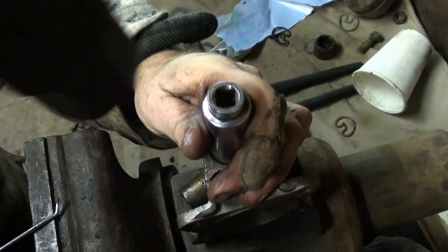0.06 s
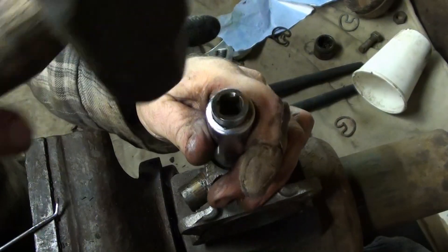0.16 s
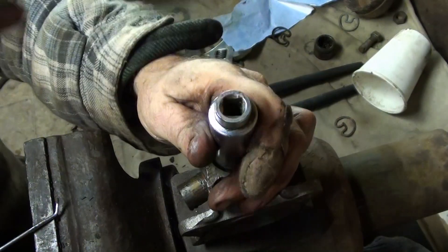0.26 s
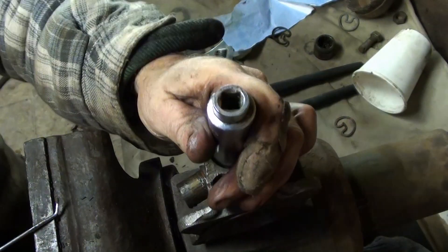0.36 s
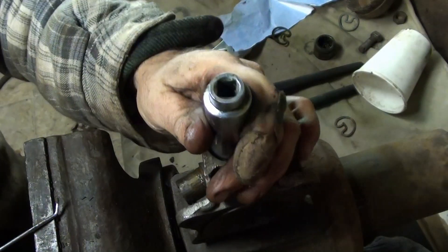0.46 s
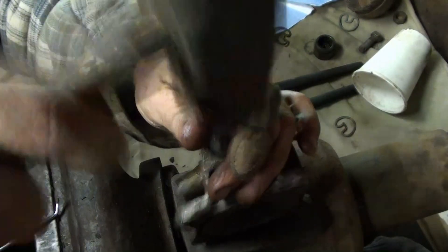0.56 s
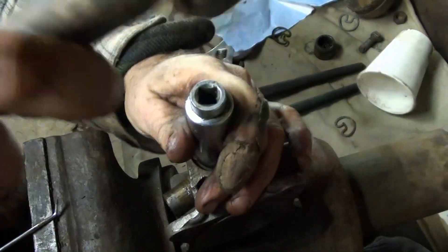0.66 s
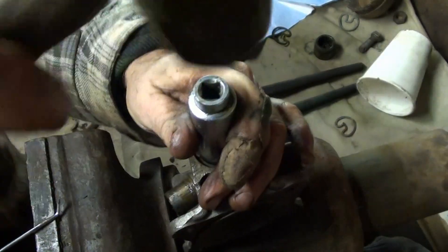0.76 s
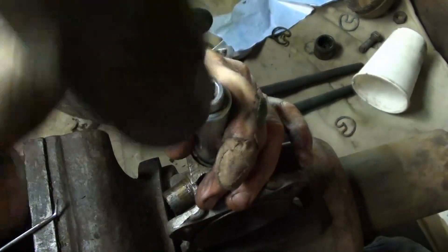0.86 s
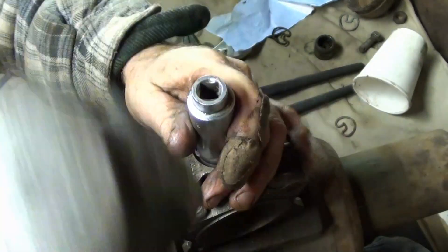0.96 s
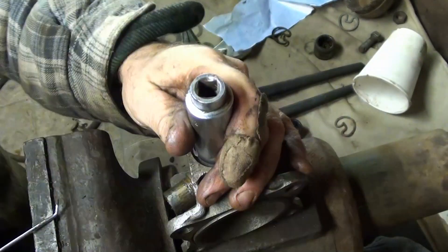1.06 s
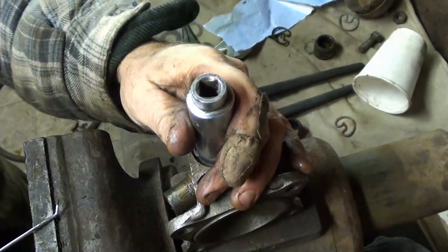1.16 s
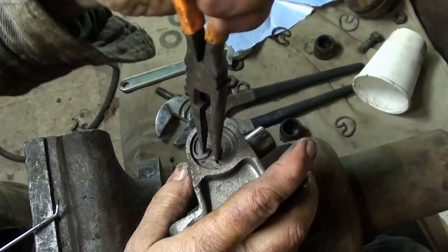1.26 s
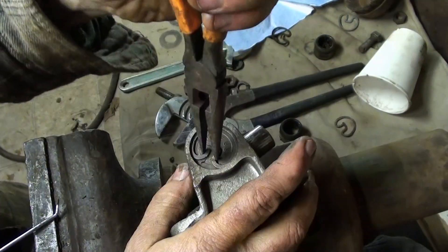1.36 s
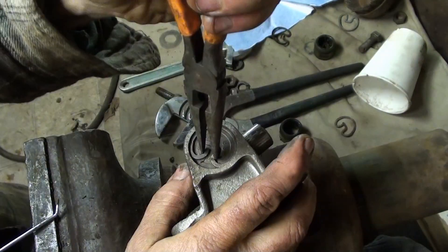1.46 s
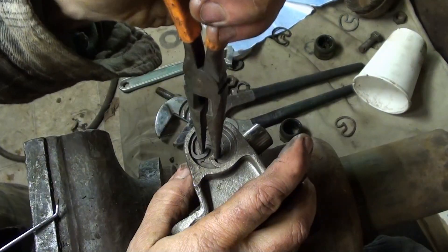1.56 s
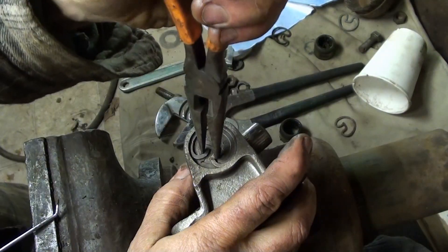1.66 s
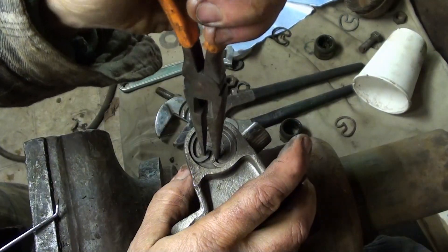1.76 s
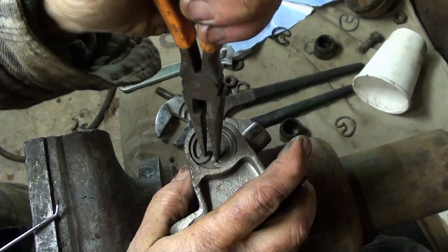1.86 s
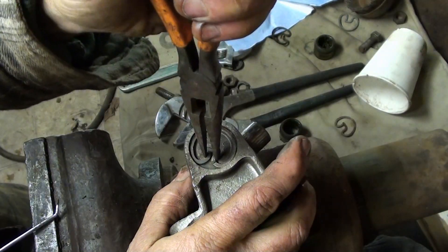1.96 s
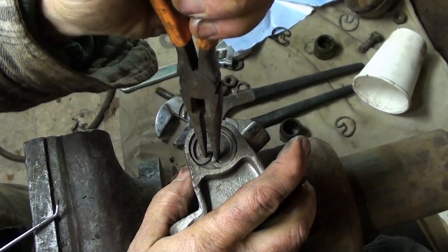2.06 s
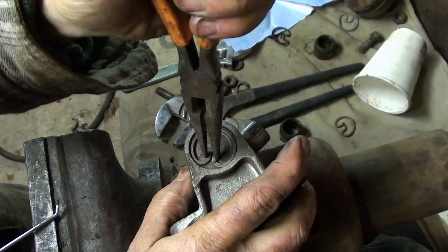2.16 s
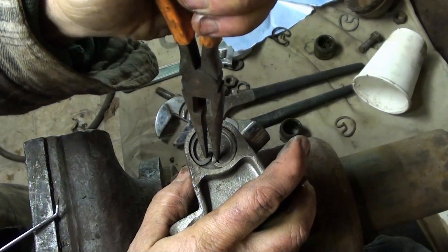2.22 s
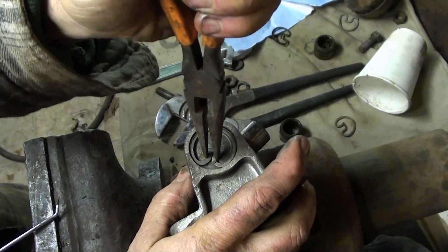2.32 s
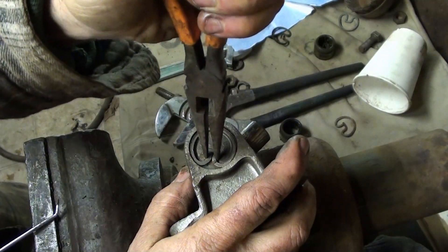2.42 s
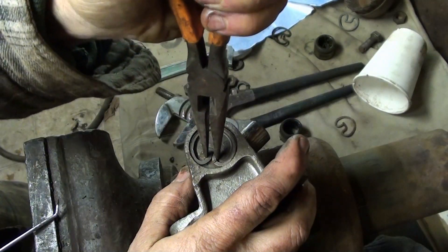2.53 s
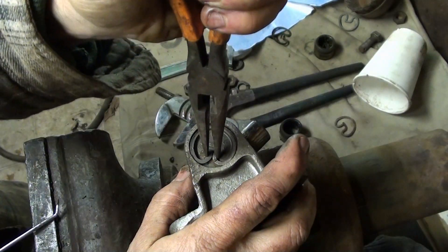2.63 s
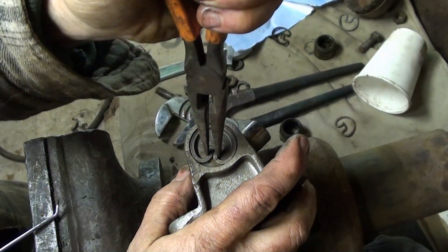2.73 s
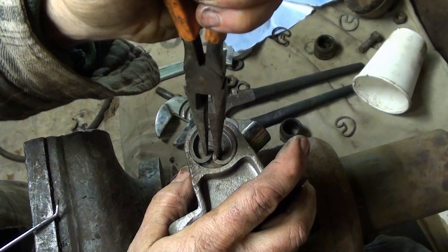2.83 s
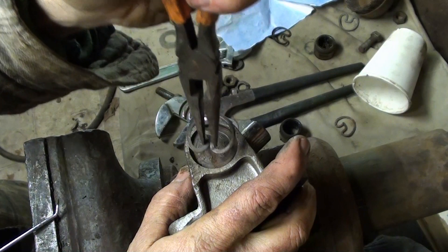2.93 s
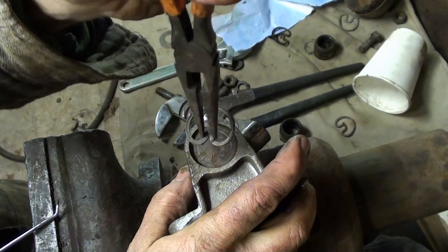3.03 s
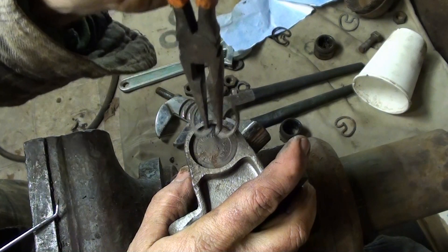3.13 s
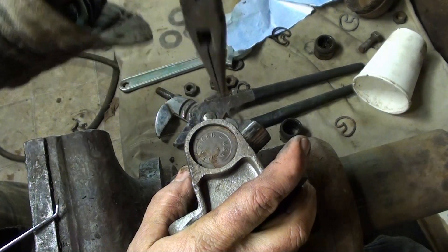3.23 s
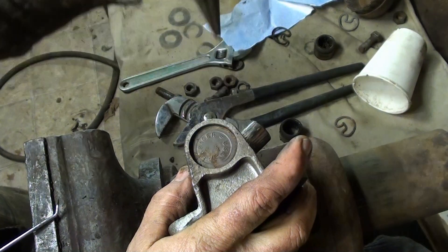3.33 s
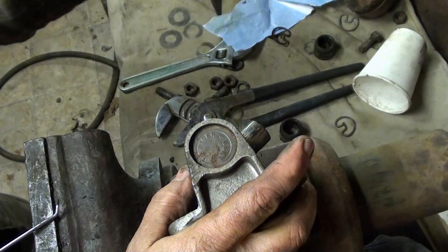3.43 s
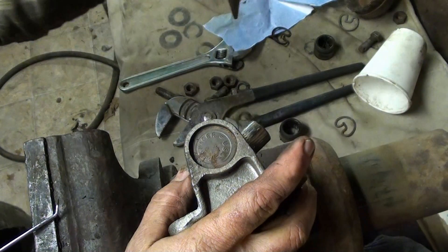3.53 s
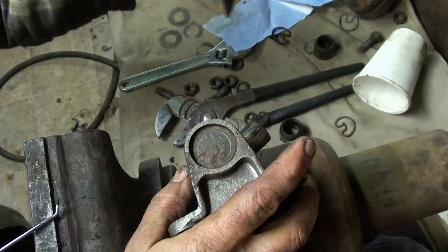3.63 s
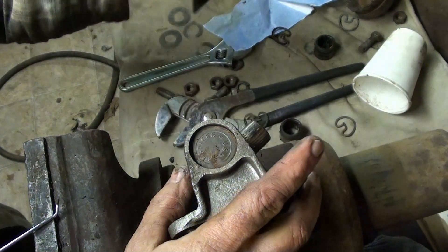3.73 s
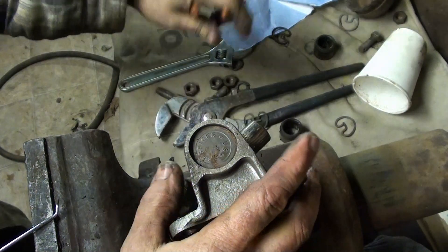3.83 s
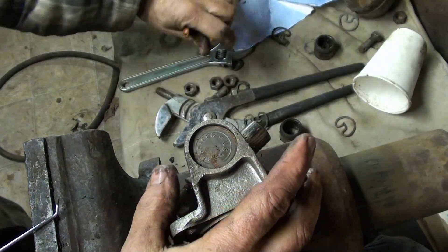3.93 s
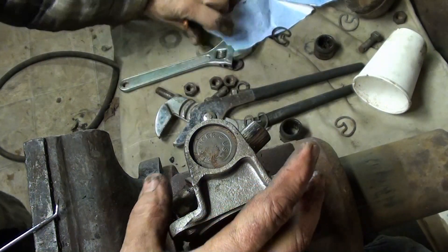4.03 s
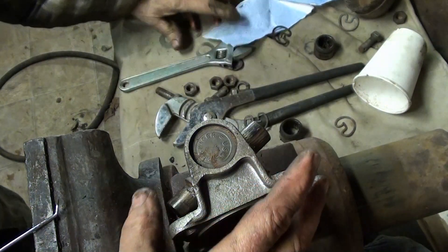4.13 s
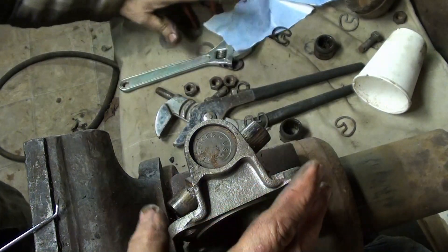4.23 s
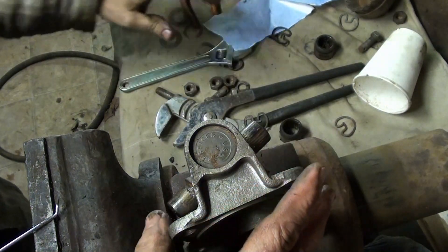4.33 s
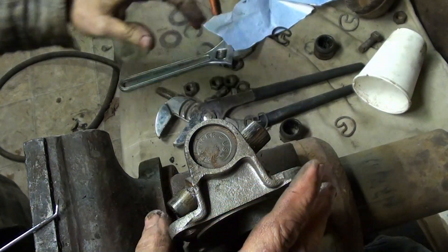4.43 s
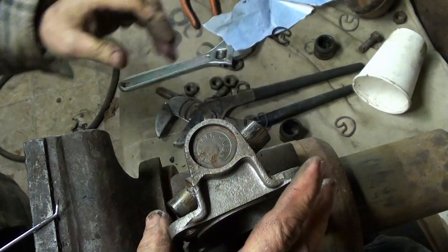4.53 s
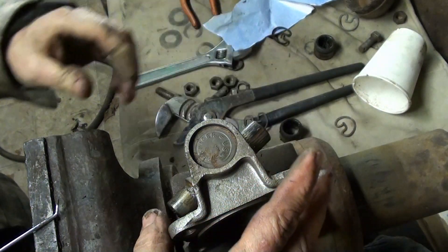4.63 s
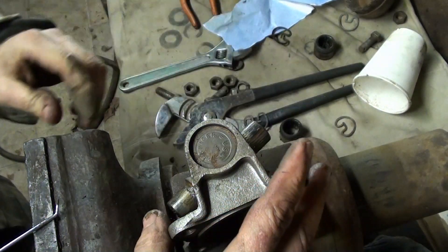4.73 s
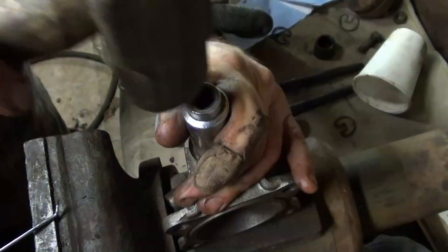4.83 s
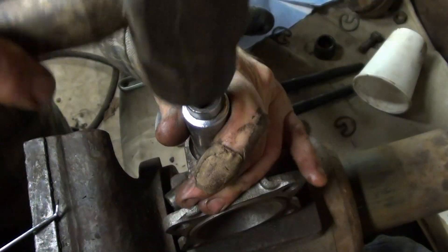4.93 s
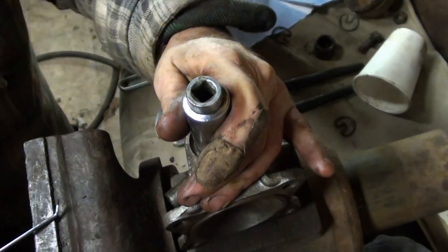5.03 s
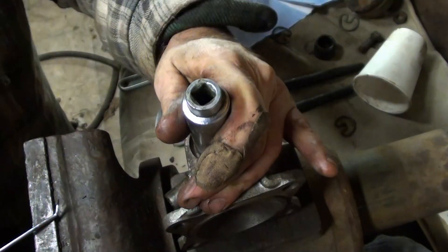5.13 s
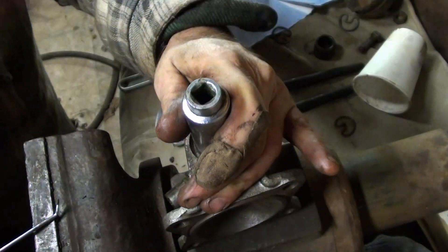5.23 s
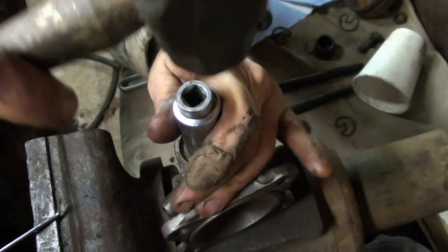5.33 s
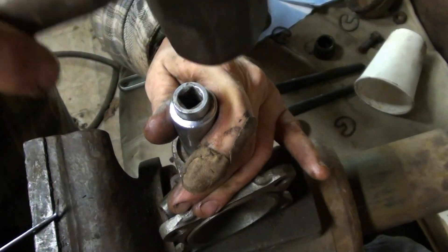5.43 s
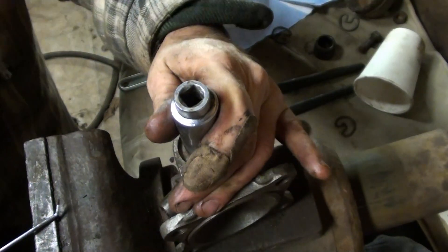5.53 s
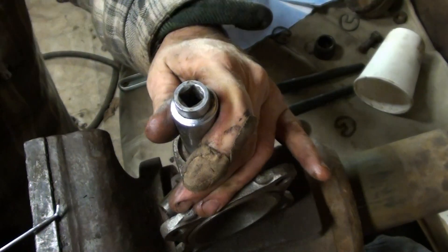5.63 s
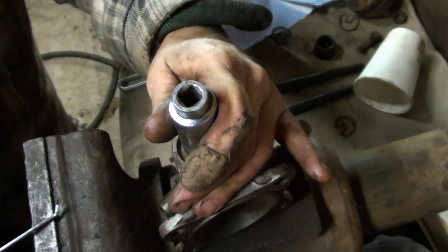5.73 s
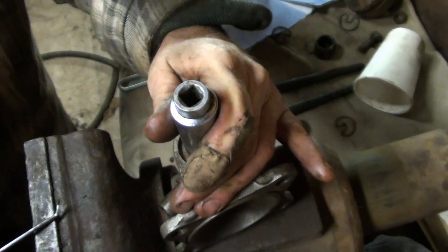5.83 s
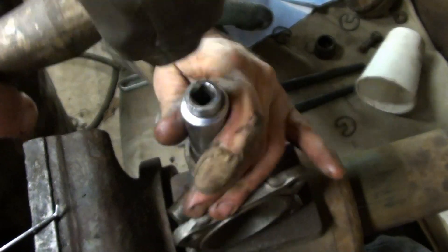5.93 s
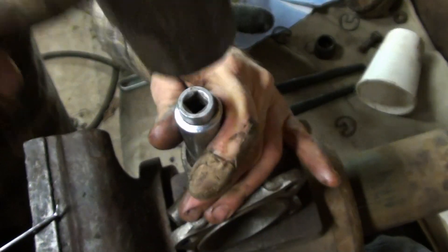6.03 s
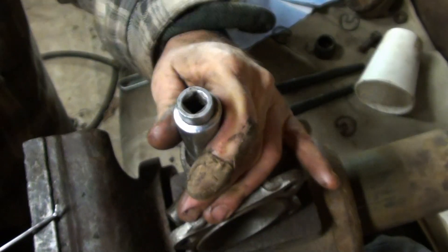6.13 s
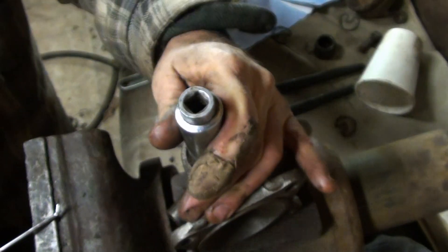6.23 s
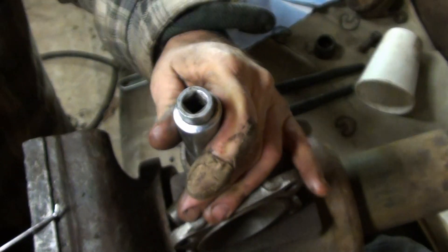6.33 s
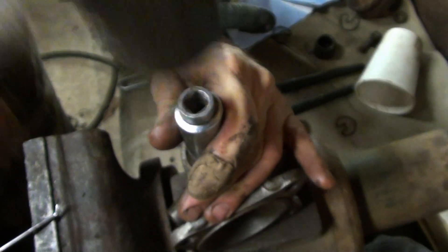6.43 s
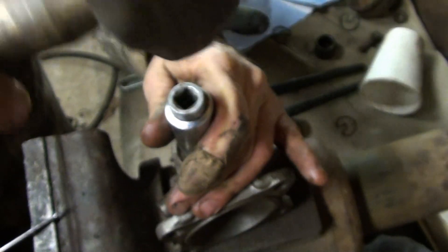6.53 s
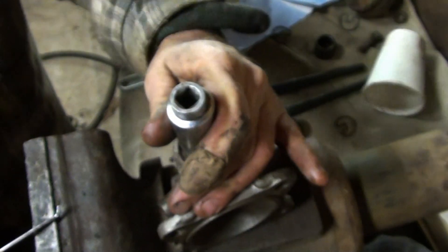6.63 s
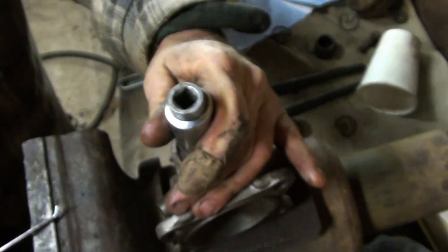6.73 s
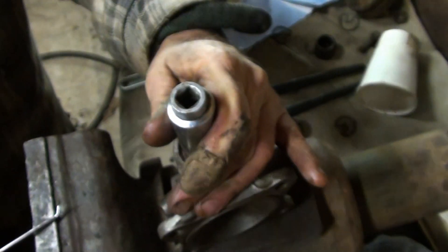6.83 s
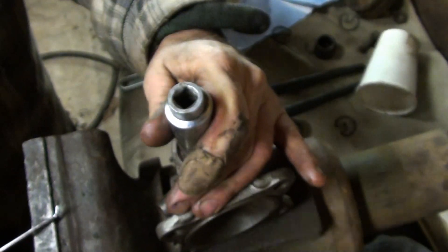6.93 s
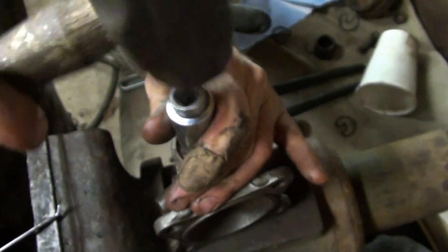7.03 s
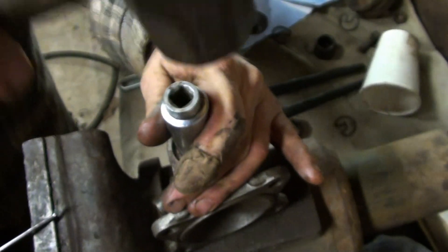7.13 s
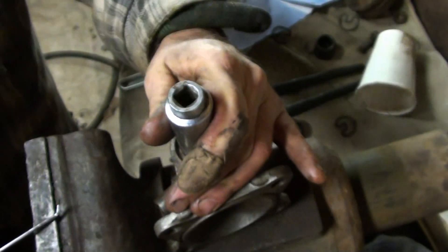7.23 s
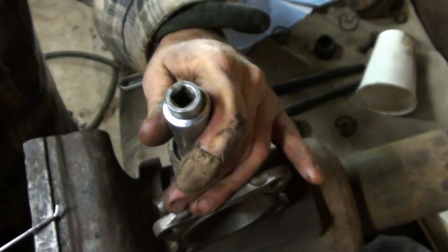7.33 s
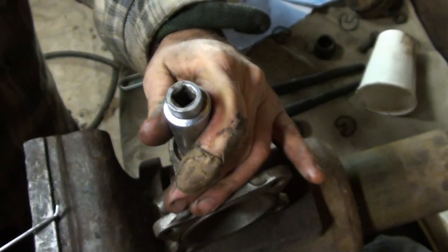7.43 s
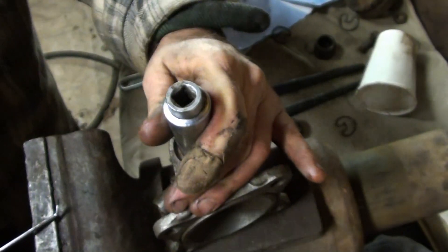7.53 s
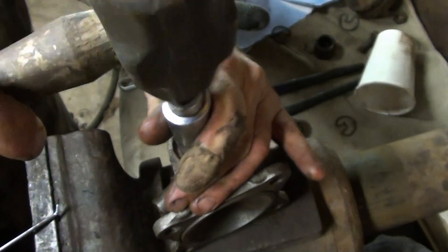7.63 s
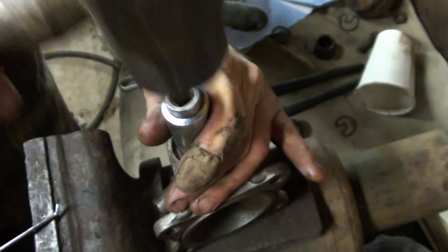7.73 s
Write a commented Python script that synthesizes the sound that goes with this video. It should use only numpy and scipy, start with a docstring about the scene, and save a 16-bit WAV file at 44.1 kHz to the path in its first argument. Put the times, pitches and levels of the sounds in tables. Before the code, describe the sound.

A sharp steel hammer blow, flattened by the close microphone's limiter, booms through a heavy bench and sets loose steel ticking. Later pliers click off a snap ring that tinkles down, and a metal yoke clatters in vise jaws. Regular hammering then resumes, five hard ringing strikes in a short workshop reverberation, less midrange clang and more treble as the bearing cup loosens. Thin far-off peeps and quiet steady hiss fill the gaps.

```python
"""A hammer drives a steel socket onto a bearing cup in a yoke held in a vise, in a small workshop.
Each blow is a noise crack, room reverberation and decaying steel modes; the bench booms on and loose steel rattles.
Between blows pliers work a snap ring free, small steel parts clink down and the yoke clanks over in the jaws,
all as struck modes with short noise. Faint sliding-tone chirps come from afar over a quiet hiss of shaped noise.
The microphone is close, and its limiter flattens the blows."""
import sys
import numpy as np
from scipy import signal
from scipy.io import wavfile
from scipy.ndimage import uniform_filter1d, minimum_filter1d

SR = 44100
rng = np.random.default_rng(int(sys.argv[2]) if len(sys.argv) > 2 else 0)


def unload_wav(signal):
    """Save mono or channel-first audio to the path in sys.argv[1] as 16-bit WAV at rate SR, clipped to [-1, 1]."""
    wavfile.write(
        sys.argv[1],
        SR,
        np.round(np.clip(np.atleast_2d(signal).T, -1, 1) * 32767).astype(np.int16),
    )


N = 342657
# time axis of a single event (s)
T = np.arange(int(1.4 * SR)) / SR

# hammer blows: start_s, level_db, bench_boom_db, strongest_ring_hz, strongest_ring_db (relative to the blow)
BLOWS = [(0.6878, -4.5, -28, 7470, -13.5), (5.41, -6.5, -33.5, 9600, -16), (5.9840, -3.5, -33, 9850, -11.5),
         (6.5688, -2, -28.5, 9420, -12.5), (7.134, -2, -32, 7480, -6), (7.6892, -5, -27, 10000, -18)]
# spectrum of small steel parts clinking: frequency_hz, relative_db (per Hz)
CLINK_COLOUR = [(60, -21), (400, -3.5), (800, -13), (1300, -8), (3000, -7), (5000, -4), (7000, 5),
                (9500, -9.5), (12000, -12), (16000, -28)]
# stereo side relative to mid, for sound near the microphone: frequency_hz, side_db
NEAR_SIDE = [(110, -31), (350, -22.5), (700, -15), (1500, -12.5), (5000, -12.5), (8000, -13.5),
             (15000, -32.5)]


def undb(db):
    """Decibels to gain."""
    return 10 ** (np.asarray(db) / 20)


def unit(x):
    """Scale to rms 1."""
    return x / np.sqrt(np.mean(x ** 2))


def along(points, hz):
    """Read (frequency_hz, value) points on a log-frequency axis."""
    f, value = np.transpose(points)
    return np.interp(np.log(hz + 1), np.log(f), value)


def add(out, s, sound):
    """Mix a sound in at time s."""
    i = int(s * SR)
    out[:, i:i + sound.shape[1]] += sound[:, :N - i]


def fade(t60):
    """Exponential decay, 60 dB down after t60 seconds."""
    return np.exp(-np.log(1000) * T / t60)


def wash(colour, t60s=None, size=len(T), width=NEAR_SIDE, build_cycles=1.9):
    """Diffuse stereo noise of a given colour; with t60s each frequency swells, then dies at its own rate."""
    noise = rng.standard_normal((2, size))
    hz, t, z = signal.stft(noise, SR, nperseg=1024)
    gain = unit(undb(along(colour, hz)))[:, None]
    if t60s is not None:
        swell = 1 - np.exp(-np.outer(hz, t + 0.0015) / build_cycles)
        decay = np.exp(-np.log(1000) * t / along(t60s, hz)[:, None])
        gain = gain * swell * decay
    z = z * gain
    z[1] *= undb(along(width, hz))[:, None]
    mid, side = signal.istft(z, SR)[1][:, :size]
    return np.array([mid + side, mid - side])


def ring(modes, scatter_db, waver, waver_hz=60, side_db=-2, build_cycles=6.5):
    """Decaying modes, struck a little differently each time; random wavering differs left and right."""
    out = 0
    knots = np.arange(int(waver_hz * T[-1]) + 2) / waver_hz
    for hz, db, t60 in modes:
        strength, phase = rng.standard_normal(2)
        # complex noise turns the phase as well as the level
        draws = rng.standard_normal((2, len(knots), 2)) @ [1, 1j]
        wander, side = (np.interp(T, knots, d) for d in draws)
        mid = (1 + waver * wander) / np.hypot(1, waver)
        side = side * undb(along(NEAR_SIDE, hz) + side_db)
        build = 1 - np.exp(-hz * T / build_cycles)
        tone = fade(t60) * build * np.exp(2j * np.pi * (hz * T + phase))
        stereo = np.imag(np.array([mid + side, mid - side]) * tone)
        out = out + undb(db + scatter_db * strength) * stereo
    return out


def contact(colour, crack_db, crack_t60):
    """The crack of steel on steel followed by the room's answer, each frequency dying at the room's rate."""
    # workshop reverberation: frequency_hz, t60_s
    reverb_times = [(80, 0.6), (300, 0.4), (800, 0.4), (2000, 0.36), (5000, 0.33), (8000, 0.28),
                    (13000, 0.2)]
    high_pass = signal.butter(2, 350, "high", fs=SR, output="sos")
    crack = signal.sosfilt(high_pass, wash(colour) * fade(crack_t60))
    return undb(crack_db) * crack + wash(colour, reverb_times)


def hammer(modes_db=-9, rise_s=0.0014, treble_hz=4100, clang_hz=2100):
    """Each blow fills the room, rings socket and yoke and booms the bench; the looser the cup, the brighter."""
    # spectrum of a blow: frequency_hz, relative_db (per Hz)
    blow_colour = [(30, -45), (60, -51), (110, -11), (200, -12), (380, -4.5), (600, -8), (850, -6),
                   (1100, -8), (1400, -8), (2300, -6), (3300, -7), (4500, -11), (6800, -6), (9800, -11.5),
                   (11500, -19.5), (13000, -33), (15500, -34)]
    # socket, yoke and vise ringing together: frequency_hz, relative_db, t60_s
    yoke_modes = [(387.4, -8, 0.36), (744.5, -11.5, 0.43), (1265, -4, 0.34), (1300, -5.5, 0.3),
                  (1522, -7.5, 0.27), (1670, -8.5, 0.35), (1970, -12, 0.44), (2206, -7.5, 0.39),
                  (2724, -5, 0.21), (2975, -11, 0.33), (3620, -10, 0.38), (5668, -14, 0.48),
                  (6170, -15, 0.19), (6430, -6.5, 0.27), (6720, -6.5, .34), (7500, -6.5, 0.23),
                  (8330, 1, 0.11), (9580, -6, 0.21), (9900, 9.5, 0.055), (9800, -17, 0.32),
                  (10750, -15.5, 0.24), (14860, -15, 0.11)]
    # the cup starts to slide and comes nearly free: start_s, nearly_free_s
    slide_times = (5.4, 7.08)
    # midrange clang, lost as the cup slides: tight_db, nearly_free_db
    clang_range = (3.5, -2.5)
    # treble, gained as the cup slides: tight_db, nearly_free_db
    treble_range = (-1.3, 2.2)
    out = np.zeros((2, N))
    for s, db, boom_db, ring_hz, ring_db in BLOWS:
        clang_db = np.interp(s, slide_times, clang_range)
        treble_db = np.interp(s, slide_times, treble_range)

        def landing_db(hz):
            """How strongly this blow drives each frequency."""
            clang = clang_db * np.exp(-np.log2(hz / clang_hz) ** 2)
            return clang + treble_db / (1 + (treble_hz / hz) ** 8)

        colour = [(hz, level + landing_db(hz)) for hz, level in blow_colour]
        modes = [(hz, level + landing_db(hz), t60) for hz, level, t60 in yoke_modes]
        steel = undb(modes_db) * ring(modes, scatter_db=0.8, waver=1.0, waver_hz=100)
        steel = steel + undb(ring_db) * strongest_ring(ring_hz)
        # each blow starts with a short, soft rise
        rise = 1 - np.exp(-(T / rise_s) ** 2)
        blow = rise * (contact(colour, crack_db=-17, crack_t60=0.03) + steel)
        add(out, s, undb(db) * blow + undb(boom_db) * bench_boom())
    return out


def strongest_ring(hz, t60=0.3, waver=3.0, waver_hz=330):
    """One strong ring of the socket per blow, spread into a narrow noisy band by fast random wavering."""
    return ring([(hz, 0, t60)], scatter_db=0, waver=waver, waver_hz=waver_hz)


def bench_boom(modes_db=-7, boom_t60=1.07, build_s=0.0045):
    """The heavy bench takes a moment to start moving, then booms as decaying noise and low modes."""
    # spectrum of the boom: frequency_hz, relative_db (per Hz)
    boom_colour = [(30, -24), (60, -20), (110, -2), (300, 4), (600, -5), (1500, -11.5), (4000, -19),
                   (8000, -23), (12000, -49.5)]
    # bench and vise stand: frequency_hz, relative_db, t60_s
    bench_modes = [(91.5, -11, 1.3), (134.3, -10.5, 1.6), (182, -14, 1.4), (235, -17, 1.2),
                   (277, -0.5, 1.24), (319, -1.5, 0.83), (374, -3, 1.08), (443, -6.5, 0.96)]
    tone = undb(modes_db) * ring(bench_modes, scatter_db=2.0, waver=0.21, waver_hz=23.7)
    boom = wash(boom_colour) * fade(boom_t60) + tone
    return boom * (1 - np.exp(-T / build_s))


def rattles(count=4, jitter_s=0.008, scatter_octaves=0.3):
    """Loose steel, hopping when a blow shakes the bench hard enough, ticks unevenly and weaker until it settles."""
    delay_s, gap_s = 0.19, 0.09
    first_db, fall_db = -57.5, 1.8  # fall per tick
    centre_hz, width_octaves = 4800, 0.98
    above_boom_db = -30.5  # a weaker boom shakes nothing loose
    out = np.zeros((2, N))
    for blow_s, _, boom_db, *_ in BLOWS:
        for k, (late, pitch) in enumerate(rng.standard_normal((count, 2))):
            s = blow_s + delay_s + k * gap_s + jitter_s * late
            if boom_db > above_boom_db and s < N / SR:
                tick = knock(centre_hz * 2 ** (scatter_octaves * pitch), width_octaves)
                add(out, s, undb(first_db - k * fall_db) * tick)
    return out


def clinks(hits, modes, colour, modes_db, crack_db, room_db, waver, waver_hz):
    """Light hits on one steel part: its modes ring over a short crack and the room."""
    out = np.zeros((2, N))
    for s, db in hits:
        tone = undb(modes_db) * ring(modes, scatter_db=2.5, waver=waver, waver_hz=waver_hz)
        noise = undb(room_db) * contact(colour, crack_db, crack_t60=0.041)
        add(out, s, undb(db) * (noise + tone))
    return out


def pliers():
    """The pliers snap off the ring and their steel modes sound."""
    # pliers snapping off: start_s, level_db
    snaps = [(3.3258, -29.5)]
    # modes of the pliers: frequency_hz, relative_db, t60_s
    modes = [(1150, -19, 0.66), (2075, -4.5, 0.27), (2220, -6.5, 0.39), (4160, -4, 0.21), (4560, -2, 0.29),
             (6730, -2.5, 0.28), (7200, -4, 0.22), (8100, -0.5, 0.23), (8770, -8, 0.37), (10200, -4, 0.17)]
    return clinks(snaps, modes, CLINK_COLOUR, modes_db=-2.5, crack_db=8, room_db=-5.5,
                  waver=1.9, waver_hz=226)


def snap_ring():
    """The freed snap ring bounces, its high modes ringing at each contact."""
    # bounces: start_s, level_db
    bounces = [(3.4705, -27), (3.5792, -32), (3.6455, -42.5)]
    # modes of the snap ring: frequency_hz, relative_db, t60_s
    modes = [(6300, -2, 0.44), (7900, -3, .17), (8680, -10.5, 0.33), (10200, -11, 0.19), (12580, -8, .17),
             (14980, -7, .15)]
    return clinks(bounces, modes, CLINK_COLOUR, modes_db=-0.5, crack_db=8, room_db=-7.0,
                  waver=0.74, waver_hz=46.4)


def yoke_clanks():
    """The yoke tips over in the vise jaws and sets low and high modes ringing."""
    # clanks: start_s, level_db
    hits = [(4.1828, -22.5), (4.1915, -23), (4.2012, -22.5), (4.2425, -15)]
    # modes of yoke and jaws: frequency_hz, relative_db, t60_s
    modes = [(281.5, -1.5, 0.49), (385, -1.5, 0.44), (4930, -3, 0.17), (5093, -4, 0.17), (8240, -3, 0.076),
             (10100, 2, 0.072), (10050, 8.5, 0.066), (10100, -17, .25)]
    # spectrum of a clank: frequency_hz, relative_db (per Hz)
    colour = [(30, -45), (60, -28), (120, 1.5), (180, -5.5), (280, -3), (400, 1), (800, -3), (1500, -6.5),
              (2600, -14), (4200, -13.5), (5000, -8.5), (5600, -13), (8000, -7), (9000, -16.5),
              (10400, -1.5), (11500, -28), (15500, -37)]
    return clinks(hits, modes, colour, modes_db=-6.5, crack_db=10.5, room_db=-3.5,
                  waver=1.0, waver_hz=140.2)


def knock(hz, octaves, skirt_db=30):
    """One brief knock of a small part: noise in its own range of pitch, without separate modes."""
    grid = np.geomspace(30, 16000, 120)
    distance = np.log2(grid / hz) / octaves
    colour = np.column_stack([grid, -skirt_db * np.log10(1 + distance ** 2 / 2)])
    return contact(colour, crack_db=12, crack_t60=0.04)


def knocks():
    """Tools and loose parts knock as they are handled, each a short band of noise."""
    # knocks: start_s, level_db, centre_hz, width_octaves
    hits = [(1.665, -57, 392, 0.48), (1.852, -45.5, 6760, 0.19), (3.453, -42, 1165, 0.17),
            (3.455, -42, 1900, 0.66), (3.644, -55, 1670, 0.66), (4.356, -44.5, 2920, 0.51),
            (4.899, -57, 405, 0.76), (6.807, -47.5, 5660, 0.41), (7.619, -60, 1290, 1.1)]
    out = np.zeros((2, N))
    for s, db, hz, octaves in hits:
        add(out, s, undb(db) * knock(hz, octaves))
    return out


def chirps(rough=0.0185, scatter=0.013):
    """Thin distant peeps come in even bouts; each swells and dies, quivers and slides down in pitch."""
    # bouts: start_s, end_s, level_db
    bouts = [(1.554, 2.16, -69), (2.69, 3.1, -73), (4.56, 4.85, -66.5), (6.44, 6.55, -63.5)]
    gap_s, length_s = 0.165, 0.145
    middle_hz, fall_hz_per_s = 4400, 1670  # before the random scatter and quiver
    out = np.zeros((2, N))
    t = T[:int(length_s * SR)]
    for start, end, db in bouts:
        for s in np.arange(start, end, gap_s):
            quiver = unit(uniform_filter1d(rng.standard_normal(len(T)), size=100))[:len(t)]
            pitch_hz = middle_hz * (1 + scatter * rng.standard_normal() + rough * quiver)
            pitch_hz = pitch_hz - fall_hz_per_s * (t - length_s / 2)
            swell = 2 * np.sin(np.pi * t / length_s)
            peep = swell * np.sin(2 * np.pi * np.cumsum(pitch_hz) / SR)
            add(out, s, undb(db) * peep[None])
    return out


def air(level_db=-58.5):
    """A quiet, steady, wide hiss of shaped noise."""
    # spectrum of the hiss: frequency_hz, relative_db (per Hz)
    colour = [(15, -45.5), (25, -15), (69, -4), (122, -2.5), (227, -2.5), (297, -2.5), (457, -4), (523, -3),
              (631, -4.5), (3090, -9), (4620, -8.5), (5580, -9.5), (15500, -12.5)]
    # stereo side relative to mid, for distant sound: frequency_hz, side_db
    far_side = [(90, -13.5), (380, -2), (1000, 1), (2400, -3), (8000, -11.5), (15000, -22.5)]
    return undb(level_db) * wash(colour, size=N, width=far_side)


def scene():
    """All the work at the vise, with distant chirps, over a quiet hiss."""
    work = hammer() + rattles() + pliers() + snap_ring() + yoke_clanks() + knocks()
    return work + chirps() + air()


def record(dry, limit_db=-13.0, release_db_per_s=170, low_cut_hz=55, top_hz=15900):
    """Deep bass is filtered out; a fast limiter holds the blows, recovering as they die; the top is cut."""
    low_cut = signal.butter(2, low_cut_hz, "high", fs=SR, output="sos")
    dry = signal.sosfilt(low_cut, dry)
    power = np.abs(uniform_filter1d(np.mean(dry ** 2, axis=0), size=200))
    level_db = 10 * np.log10(power + 1e-12)
    # hold each peak level, falling at the release rate
    fall = release_db_per_s * np.arange(N) / SR
    held_db = np.maximum.accumulate(level_db + fall) - fall
    gain_db = np.minimum(limit_db - held_db, 0)
    # the gain drops just ahead of a blow, smoothly
    gain = undb(uniform_filter1d(minimum_filter1d(gain_db, size=60), size=30))
    top_cut = signal.ellip(8, 0.2, 70, top_hz, fs=SR, output="sos")
    return signal.sosfilt(top_cut, dry * gain)


dry = scene()
out = record(dry)
unload_wav(out)
```